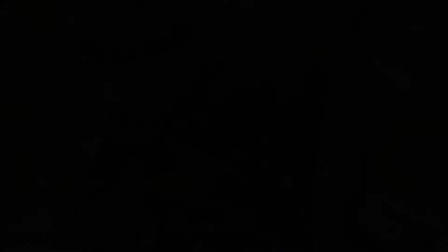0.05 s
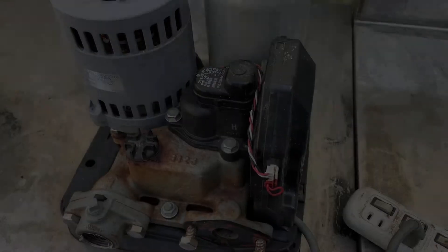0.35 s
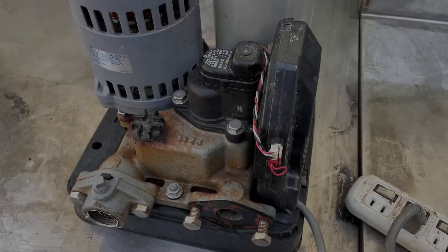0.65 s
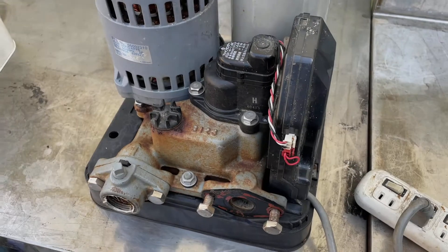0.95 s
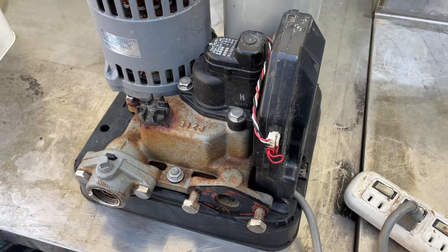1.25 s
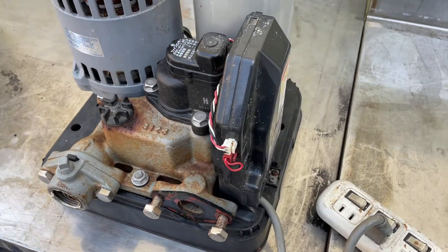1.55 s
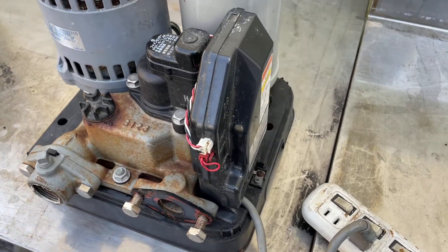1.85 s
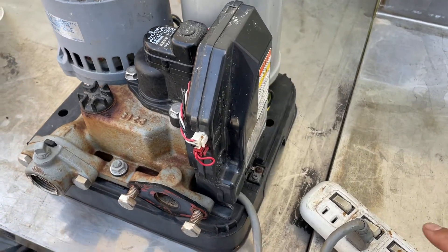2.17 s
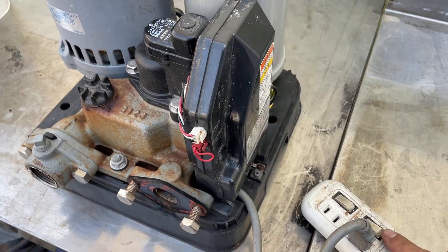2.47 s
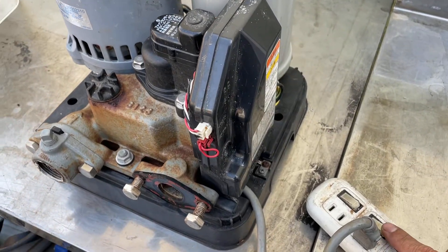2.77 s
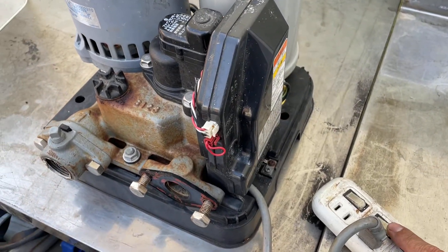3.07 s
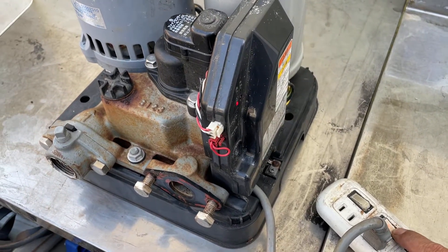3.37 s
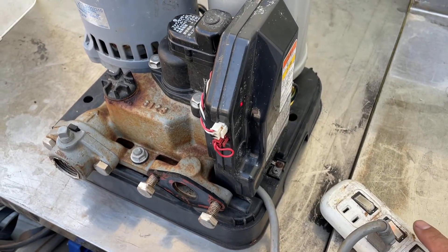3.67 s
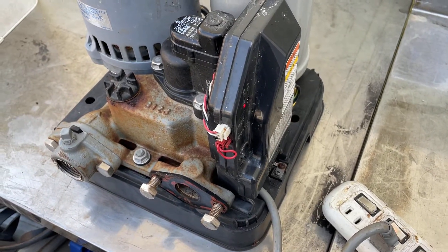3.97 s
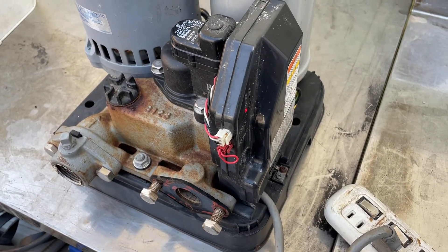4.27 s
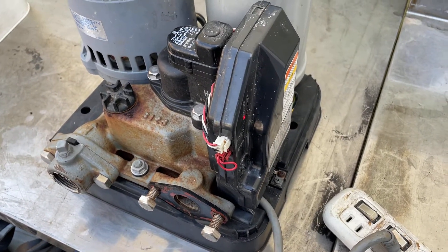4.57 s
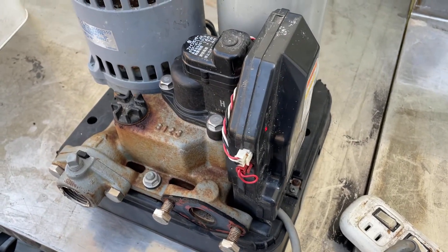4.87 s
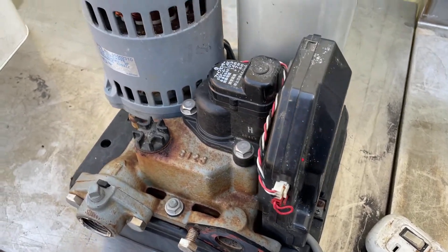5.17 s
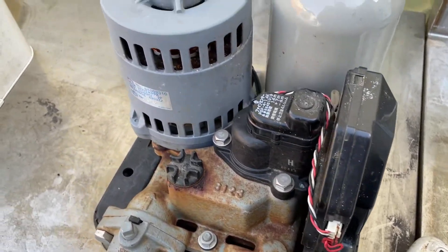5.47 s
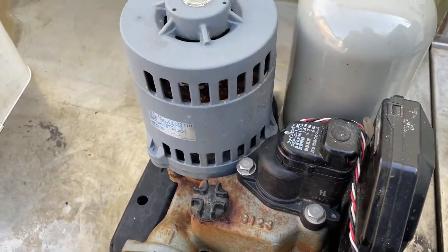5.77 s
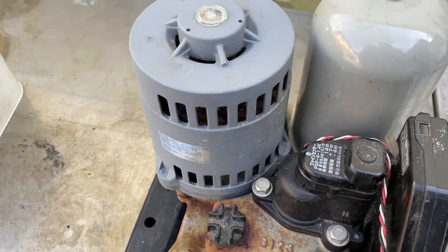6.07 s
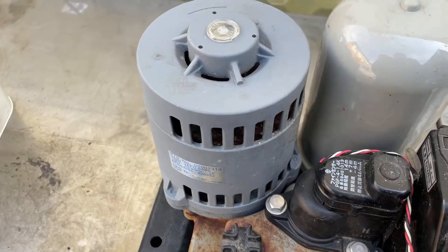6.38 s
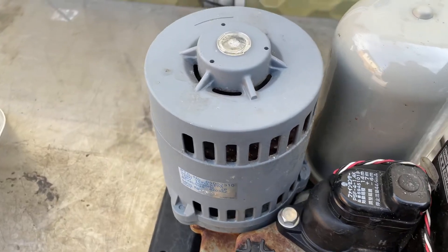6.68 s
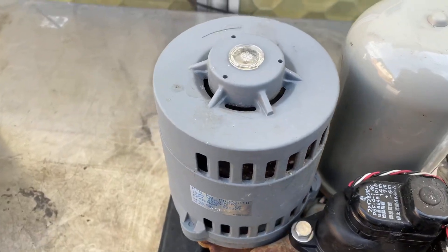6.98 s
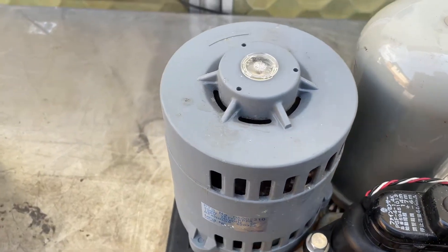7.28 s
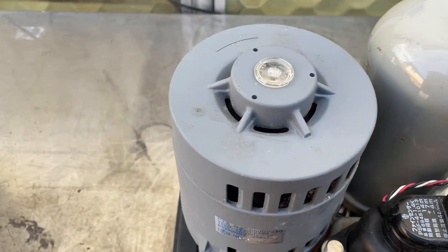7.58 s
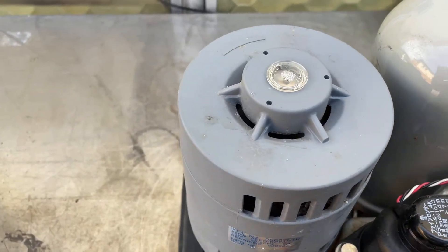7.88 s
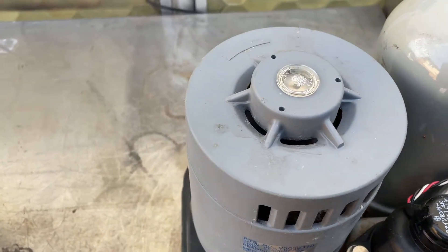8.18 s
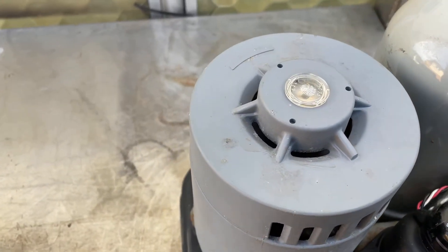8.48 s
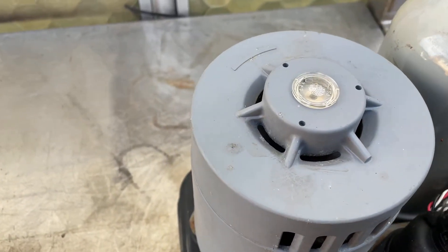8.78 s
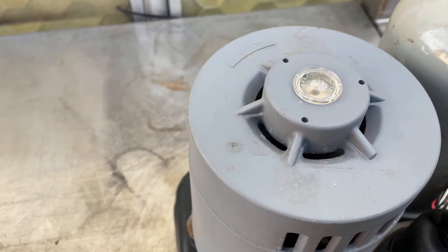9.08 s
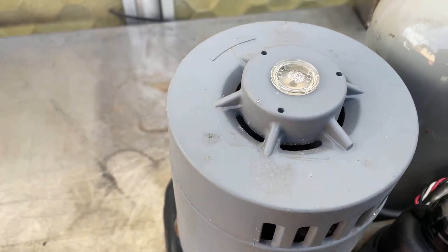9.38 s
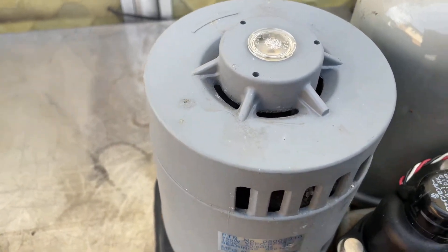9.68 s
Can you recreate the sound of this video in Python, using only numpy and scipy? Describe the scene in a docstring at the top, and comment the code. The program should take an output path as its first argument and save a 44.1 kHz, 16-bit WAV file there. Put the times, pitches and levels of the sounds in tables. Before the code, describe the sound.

An electric water pump starts up indoors, heard from close by. First come a few soft taps and scuffs on a hollow casing, then the sharp snap of a switch and a small relay tick. The motor reaches speed at once and keeps running, its electric hum mixed with whining bearings and cooling air. The whir grows slightly louder as the microphone moves over the motor, with two brief knocks along the way.

```python
"""Hands click, bump and rub on a hollow case in a quiet room. A power strip switch snaps, and a relay
ticks as an electric water pump spins up on a steel bench. Magnetic mains hum beats against a bearing
tone, shaft harmonics whine, the bearing balls excite the housing resonances and cooling air rushes.
The balance of these sounds shifts as the microphone moves from the switch to above the motor."""
import sys
import numpy as np
from scipy import signal
from scipy.fft import rfft, irfft, next_fast_len
from scipy.io import wavfile
from scipy.ndimage import uniform_filter1d

SR = 44100
rng = np.random.default_rng(int(sys.argv[2]) if len(sys.argv) > 2 else 0)


def inscribe(sig):
    """Save sig as 16-bit PCM at rate SR to the path in sys.argv[1].

    A 1-D sig is mono; a 2-D sig holds one channel per row.
    Samples are clipped to [-1, 1] before scaling.
    """
    pcm = np.round(np.clip(np.atleast_2d(sig).T, -1, 1) * 32767)
    wavfile.write(sys.argv[1], SR, pcm.astype(np.int16))


N = 438354
TIME = np.arange(N) / SR
START_S, RUN_UP_S, SHAFT_HZ = 3.707, .3, 59.92
BALL_COUNT, OUTER_PASSES = 8, 3.088  # passes of a ball over one spot on the race, per shaft turn
INNER_PASSES = BALL_COUNT - OUTER_PASSES


def undb(db):
    """Amplitude ratio of a level in decibels."""
    return 10 ** (np.asarray(db) / 20)

def noise():
    """White noise with a spectral density of 0 dB per Hz."""
    return rng.standard_normal(N) * np.sqrt(SR / 2)

def noise_pair():
    """Two uncorrelated white noises."""
    return np.array([noise(), noise()])

def wander(rate_hz):
    """Smooth random modulation with a standard deviation near 1."""
    knots = rng.standard_normal(int(rate_hz * N / SR) + 3)
    joined = np.interp(TIME * rate_hz, np.arange(len(knots)), knots)
    return 1.235 * uniform_filter1d(joined, int(SR / rate_hz / 2))

def swell(peak_s, width_s):
    """A Gaussian rise and fall."""
    return np.exp(-.5 * ((TIME - peak_s) / width_s) ** 2)

def onset(at_s, width_s):
    """A smooth step from 0 to 1."""
    return .5 + .5 * np.tanh((TIME - at_s) / width_s)

def band(x, hz, width_hz):
    """Two equal resonators in cascade: unit gain at the centre, steep skirts."""
    g, k = np.tan(np.pi * min(hz, .45 * SR) / SR), width_hz / hz
    section = np.array([g * k, 0, -g * k, 1 + g * k + g * g, 2 * g * g - 2, 1 - g * k + g * g])
    section /= section[3]
    return signal.sosfilt([section, section], x + 1e-18)

def shape(x, response):
    """Linear filtering: the spectrum is multiplied by a frequency response."""
    size = next_fast_len(N, True)
    hz = np.arange(size // 2 + 1) * SR / size
    return irfft(rfft(x, size) * response(hz), size)[..., :N]

def at_frequency(rows, hz):
    """Interpolation of (frequency_hz, value) rows on a logarithmic frequency axis."""
    points, values = np.transpose(rows)
    return np.interp(np.log(hz + 1), np.log(points), values)

def colour(x, rows):
    """Spectral shaping by (frequency_hz, gain_db) rows."""
    return shape(x, lambda hz: undb(at_frequency(rows, hz)))

def at_place(place, place_db):
    """Level at the microphone, interpolated between those at places 0 to 3."""
    return np.interp(place, np.arange(len(place_db)), place_db)

# Level difference between the microphone ports: frequency_hz, left_minus_right_db
PORT_BALANCE = [(100, -0.5), (700, 2.5), (1300, 1), (2400, 3.5), (4400, 7), (8200, 0)]
# Phase difference between the ports: frequency_hz, left_lead_rad
PORT_PHASE = [(60, 0), (1800, -.2), (2500, 1.6), (3300, .1), (5300, .1), (6550, -1), (7650, -3),
              (8900, -3.5), (11100, -6.3), (12300, -6.6), (14000, -9.2)]
def port_response(hz):
    """Sound from the bench reaches the left and right port with unequal gain and phase."""
    left = undb(at_frequency(PORT_BALANCE, hz) / 2) * np.exp(.5j * at_frequency(PORT_PHASE, hz))
    return np.array([left, 1 / left])

# Likeness of the two port signals: frequency_hz, coherence_ratio
PORT_COHERENCE = [(60, .88), (300, .78), (640, .83), (3100, .74), (6000, .85), (8200, .985), (11000, .9)]
def ports(direct, scattered):
    """Partial coherence: direct sound is common to both ports, scattered sound makes them differ."""
    def response(hz, sign):
        coherence = np.clip(at_frequency(PORT_COHERENCE, hz), 0, 1)
        return np.sqrt(1 + sign * coherence) / 2 * port_response(hz) * np.array([[1], [sign]])
    return shape(direct, lambda hz: response(hz, 1)) + shape(scattered, lambda hz: response(hz, -1))

# Spectrum of the room noise: frequency_hz, density_db
ROOM_SPECTRUM = [(20, -80), (45, -74), (75, -69.5), (120, -81), (300, -79.5), (550, -90.5), (1000, -96.5),
                 (2200, -101), (3500, -114), (7000, -126), (16000, -135)]
def background():
    """Ambient noise: a quiet broadband floor, and a narrowband rumble that swells once."""
    room = colour(noise_pair(), ROOM_SPECTRUM) * undb(1.5 + 1.3 * wander(8)) * onset(.089, .01)
    rumble = band(noise_pair(), hz=72.8, width_hz=25) * undb(-59) * swell(peak_s=2.3, width_s=.64)
    return room + rumble

def reflections(x, wet_db=-25, t60_s=.29):
    """Reverberation: the walls return the direct sound as a dull, exponentially decaying tail."""
    t = np.arange(SR // 2) / SR
    decay = undb(-60 * t / t60_s) * (t > .006)
    tail = band(rng.standard_normal((2, len(t))), 1800, 8500) * decay
    tail /= np.sqrt(np.sum(tail ** 2, axis=1, keepdims=True))
    return undb(wet_db) * signal.fftconvolve(x[:1], tail, axes=1)[:, :N]

def burst(start_s, db, hz, width_hz, rise_s, t60_s):
    """Damped vibration after a contact: a decaying noise band, as a direct and a scattered row."""
    t = np.arange(SR // 2) / SR
    envelope = np.minimum(t / rise_s, 1) * undb(-60 * np.maximum(t - rise_s, 0) / t60_s)
    sound = band(rng.standard_normal((2, len(t))), hz, width_hz) * envelope
    sound *= undb(db) * np.sqrt(np.sum(envelope ** 2) / np.sum(sound ** 2, axis=1, keepdims=True))
    return np.pad(sound, ((0, 0), (int(start_s * SR), N)))[:, :N]

# Light taps on the case: start_s, body_db, body_hz, edge_db
CASE_TAPS = [(.353, -32, 950, -46.5), (.669, -57, 900, -47), (0.943, -33.5, 1600, -48),
             (1.051, -45, 596, -53), (1.076, -61, 900, -49), (1.162, -37, 1200, -59),
             (1.181, -30.5, 1290, -54), (1.252, -46, 1500, -52), (1.348, -38, 1860, -65),
             (1.423, -49, 1100, -63), (2.341, -39, 700, -55), (3.306, -34, 1100, -66)]
# Resonances of the hollow case: centre_hz, width_hz, gain_db
CASE_MODES = [(640, 170, 4), (1050, 300, 0.5), (1616, 310, 1.5), (2150, 520, 5), (3520, 1400, -2)]
def clicks(rise_s=.0009):
    """Impact excitation: each tap has a broadband edge and rings the modes of the case."""
    taps = sum(burst(s, db, hz, 1.02 * hz, rise_s, t60_s=.046) for s, db, hz, _ in CASE_TAPS)
    edges = sum(burst(s, db, 5900, 20000, rise_s, t60_s=.036) for s, _, _, db in CASE_TAPS)
    return edges + sum(undb(db) * band(taps, hz, width) for hz, width, db in CASE_MODES)

# Dull bumps on the case and bench: start_s, level_db, centre_hz, t60_s
SOFT_IMPACTS = [(1.078, -43.5, 445, 0.14), (1.247, -39.5, 200, 0.33), (2.335, -36.5, 242, 0.22),
                (2.364, -34, 79.6, 0.24), (3.322, -28, 623, 0.02), (3.327, -36.5, 140, 0.33),
                (3.702, -44, 444, 0.97), (3.997, -30, 128, 0.17), (7.216, -28, 250, .17),
                (9.454, -26, 150, 0.067)]
def bumps(rise_s=.0047):
    """A soft impact builds slowly and excites mainly low frequencies."""
    return sum(burst(s, db, hz, .74 * hz, rise_s, t60) for s, db, hz, t60 in SOFT_IMPACTS)

# Scuffs of the hand: start_s, level_db, centre_hz, t60_s
HAND_SCUFFS = [(0.107, -77, 630, 0.98), (0.641, -45, 965, 0.14), (1.339, -38, 650, 0.19)]
# Fingers sliding on the case: start_s, length_s, level_db
FINGER_SLIDES = [(0.6, 0.7, -108), (0.807, 0.18, -109), (2.337, 0.18, -103)]
def rubbing(edge_s=.019):
    """Sliding friction makes broadband noise: dying scuffs and an uneven hiss."""
    scuffs = sum(burst(s, db, hz, 1.8 * hz, .14 * t60, t60) for s, db, hz, t60 in HAND_SCUFFS)
    contact = sum(undb(db) * (onset(s, edge_s) - onset(s + length, edge_s))
                  for s, length, db in FINGER_SLIDES)
    hiss = colour(noise_pair(), [(200, -20), (1500, 12), (5000, -2), (11000, -4.5), (16000, -20)])
    return scuffs + hiss * contact * undb(1.5 * wander(220))

def blow(start_s, db, hz):
    """Impulse response of a heavily damped body: a couple of cycles, heard as direct sound."""
    impulse = np.zeros(N)
    impulse[int(start_s * SR)] = 1
    note = band(impulse, hz, 1.03 * hz)
    return np.outer([1, 0], undb(db) * note / np.max(np.abs(note)))

# Modes of the steel bench: pitch_hz, level_db, t60_s
BENCH_MODES = [(65, -37, .4), (102, -35, .2), (177, -39, .2), (680, -25, .035), (965, -20, .045),
               (1130, -19, .035), (2220, -35, .035)]
def bench_ring(start_s):
    """Free vibration: the struck bench rings as a sum of damped sines, heard as direct sound."""
    t = np.maximum(TIME - start_s, 0)
    ring = sum(undb(db - 60 * t / t60) * np.sin(2 * np.pi * hz * t) * (t < 2 * t60)
               for hz, db, t60 in BENCH_MODES)
    return np.outer([1, 0], ring)

# Snaps of the switch and relay, then ticks over the running motor: start_s, body_db, body_hz, crack_db
SNAP_EVENTS = [(3.323, -9.5, 980, -18), (3.352, -40.5, 1000, -50), (3.739, -26.5, 1900, -50),
               (7.213, -6.5, 1660, -30.5), (9.461, -21, 620, -45)]
SWITCH_S, RELAY_S = SNAP_EVENTS[0][0], SNAP_EVENTS[2][0]
# Crack of the contact, then of the plastic shell: delay_s, gain_db, centre_hz, width_hz, t60_s
CRACK_BANDS = [(0, 6.5, 9050, 8000, 0.013), (.001, 4, 2240, 1206, 0.021), (.001, -2.5, 3400, 800, .024),
               (.0015, -5, 5580, 1210, 0.033)]
def snaps(rise_s=.00072, shudder_db=-14):
    """Hard impacts excite a wide spectrum: a blow, a shudder and a crack; the switch rings the bench."""
    out = 0
    for s, db, hz, crack_db in SNAP_EVENTS:
        out += blow(s + rise_s, db, hz)
        out += burst(s, db + shudder_db, hz, .57 * hz, rise_s, t60_s=.031)
        for delay, part_db, part_hz, width, t60 in CRACK_BANDS:
            out += burst(s + delay, crack_db + part_db, part_hz, width, rise_s, t60)
    return out + bench_ring(SWITCH_S + rise_s)

# Spectrum of the cooling air: frequency_hz, density_db
AIR_SPECTRUM = [(25, -77), (60, -64), (150, -72), (300, -71), (480, -77), (900, -73), (1550, -78.5),
                (2500, -80), (3650, -89), (5000, -86), (7000, -78.5), (8600, -95), (9500, -81),
                (13500, -86.5), (16000, -94)]
def cooling_air(gust_db=1.52):
    """Turbulent flow: air rushes through the slots in small gusts."""
    return colour(noise_pair(), AIR_SPECTRUM) * undb(gust_db * wander(9))

# Resonances of the base plate: centre_hz, width_hz, gain_db
PLATE_MODES = [(70, 28, -27), (254, 510, -35.5), (556, 23, -19.5), (859, 25, -28), (1808, 26, -19.5),
               (2130, 660, -43.5)]
def spin_up(turns):
    """Forced vibration: the torque ripple of the accelerating rotor sweeps through the plate modes."""
    torque = undb(.5) * swell(START_S + .19, width_s=.076)
    ripple = sum(np.sin(2 * np.pi * order * turns) for order in (1.8, 17, 22, 48, 110))
    shake = torque * (undb(-5) * ripple + undb(-35) * noise())
    return sum(undb(db) * band(shake, hz, width) for hz, width, db in PLATE_MODES)

def roughness(turns, worn_share=.22):
    """Surface roughness: wear marks recur with every turn, loose grit is random."""
    size = int(SR / SHAFT_HZ)
    marks = np.interp(turns % 1 * size, np.arange(size), noise()[:size], period=size)
    return np.sqrt(worn_share) * marks + np.sqrt(1 - worn_share) * noise()

# Resonances of the housing: centre_hz, width_hz, then density_db at each of places 0 to 3
HOUSING_MODES = [(649, 185, -70, -67, -66.5, -69.5), (1312, 78, -69.5, -66, -62, -64),
                 (1820, 57, -58, -59.5, -62.5, -60), (2173, 360, -70.5, -68, -64, -64.5),
                 (2428, 124, -68, -63.5, -59, -56.5), (3155, 63, -63, -94, -92, -68),
                 (3267, 140, -73.5, -73.5, -78.5, -78), (4410, 77, -71, -71, -73, -79),
                 (4860, 270, -79.5, -85, -80.5, -81), (5475, 250, -70, -66.5, -65.5, -60.5),
                 (6212, 118, -71.5, -54, -89, -74), (6160, 620, -82, -77, -66.5, -69),
                 (10596, 370, -73, -68.5, -68, -67.5), (11720, 600, -70.5, -76.5, -72.5, -80),
                 (15400, 570, -87, -85, -84, -78)]
# Brief flares of bearing scrape: peak_s, boost_db
SCRAPE_FLARES = [(4.45, 6), (5.31, 4.5), (6.43, 5), (8.7, 4.5)]
def bearings(turns, speed, place, depth=.23, flare_hz=5540, flare_width_hz=410):
    """Modulated noise: each ball passing a rough spot on a race sends grit into the housing modes."""
    outer, inner = (np.exp(-(passes * turns % 1) / .5) for passes in (OUTER_PASSES, INNER_PASSES))
    force = (1 - depth + 2 * depth * (outer + inner)) * undb(.87 * wander(90))
    grit = force / np.sqrt(np.mean(force ** 2)) * np.array([roughness(turns), roughness(turns)])
    cage = np.sin(2 * np.pi * turns * OUTER_PASSES / BALL_COUNT)
    chatter = .49 * cage + wander(70)  # the treble throbs with the ball cage and sizzles in fits
    treble = chatter - 9 * (1 - speed)  # slow balls ring dull
    flare_db = sum(db * swell(s, width_s=.1) for s, db in SCRAPE_FLARES)
    out = 0
    for hz, width, *place_db in HOUSING_MODES:
        level_db = at_place(place, place_db) + 1.37 * wander(8) + treble * min(hz / 5500, 2)
        rasp_db = flare_db * np.exp(-((hz - flare_hz) / flare_width_hz) ** 2)
        out += band(grit, hz, width) * undb(level_db + rasp_db)
    return out

def tone(cycles, db, sway):
    """Standing waves: a sine sways in level and phase at each port, modelled as a random field."""
    carrier = np.sqrt(2) * undb(db) * np.exp(2j * np.pi * cycles)
    knot_s = np.linspace(0, N / SR, 48)
    knots = rng.standard_normal((3, 2, len(knot_s)))
    common, left, right = (np.interp(TIME, knot_s, re + 1j * im) for re, im in knots)
    pair = np.array([(carrier * (1 + sway * (common + own))).imag for own in (left, right)])
    return pair / np.sqrt(1 + 2 * sway ** 2)

# Rotor and bearing tones: cycles_per_turn, then level_db at each of places 0 to 3
SHAFT_ORDERS = [(.54, -64, -55, -58, -63), (7.03, -62, -64, -64, -64), (12, -61, -55, -55, -55),
                (15, -62, -58, -59, -58), (17, -62, -59, -60, -60), (21, -62, -52, -53, -53),
                (22.06, -62, -59, -53, -58), (28.5, -68, -68, -64, -53), (30.4, -53, -57, -62, -65),
                (35, -57, -57, -50, -50.5), (39.89, -61, -54, -48.5, -46.5), (40.96, -62, -55, -50, -48),
                (42.96, -60, -56, -52, -51), (50, -62, -56.5, -53, -57), (52, -58, -50.5, -44.5, -50.5),
                (52.65, -55.5, -66, -70, -70), (103.94, -64, -50, -59, -61)]
def whine(turns, speed, place):
    """Periodic forcing: fan, rotor slots and bearings sing at multiples of the shaft rate."""
    out = 0
    for order, *place_db in SHAFT_ORDERS:
        level_db = at_place(place, place_db) + .5 * wander(20)
        out += tone(order * turns, level_db, sway=.18)
    return speed ** 2 * out

# Harmonics of the magnetic hum: harmonic_number, level_db
MAINS_HARMONICS = [(2, -37.7), (3, -62), (4, -47.3), (6, -46.5), (8, -64)]
def hum(turns, speed, place, mains_hz=60.15, starting_db=-7, settle_s=.44):
    """Magnetic hum and race tones: the sixth mains harmonic beats with twice the outer ball rate."""
    starting = 1 - onset(START_S + settle_s, .018)  # the hum is weak until the motor settles
    load_db = -1 + starting_db * starting + .23 * place
    mains = sum(tone(mains_hz * k * TIME, db + load_db, sway=.1) for k, db in MAINS_HARMONICS)
    slip_turns = .028 * wander(12)  # the balls skid a little
    outer_db = at_place(place, (-44, -41.5, -40, -43))
    inner_db = at_place(place, (-51, -52.5, -56.5, -59))
    outer = tone(2 * OUTER_PASSES * (turns + slip_turns), outer_db, sway=.08)
    inner = tone(INNER_PASSES * turns, inner_db, sway=.35)
    return np.sqrt(speed) * mains + speed ** 8.3 * (outer + inner)

# Microphone path: time_s, place (0 by the switch, 1 beside the motor, 2 at its top rim, 3 above it)
MICROPHONE_PATH = [(4.95, 0), (6.3, 1), (7.3, 1.8), (8.1, 2), (8.8, 2.5), (9.3, 3), (9.9, 2.5)]
def pump(stall_db=-18.5, knee_share=.75):
    """Rotating machine noise: the shaft accelerates evenly, and the whir grows as a power of speed."""
    speed = np.clip((TIME - START_S) / RUN_UP_S, 0, 1)
    turns = np.cumsum(SHAFT_HZ * speed * (1 + .0002 * wander(3))) / SR
    place = np.interp(TIME, *np.transpose(MICROPHONE_PATH))
    effort = undb(stall_db) + (1 - undb(stall_db)) * np.minimum(speed / knee_share, 1) ** 5.3
    drive = onset(RELAY_S, .012) * effort * undb(-.5 + .72 * place)
    rush = drive * (bearings(turns, speed, place) + cooling_air())
    whir = ports(*rush) + shape(drive * whine(turns, speed, place), port_response)
    pan_db = 1.36 - place  # left minus right: the whir drifts rightwards
    whir *= undb(np.array([pan_db, -pan_db]) / 2)
    return whir + hum(turns, speed, place) + (speed > 0) * spin_up(turns)

def scene():
    """Superposition: pump, room noise, contact sounds and their reflections add at the two ports."""
    contacts = clicks() + bumps() + rubbing() + snaps()
    return pump() + ports(*(background() + contacts + reflections(contacts)))

def record(dry, cutoff_hz=15800):
    """Band limiting: a steep elliptic low-pass removes the highest treble."""
    return signal.sosfilt(signal.ellip(10, .2, 70, cutoff_hz, fs=SR, output="sos"), dry)


dry = scene()
out = record(dry)
inscribe(out)
```